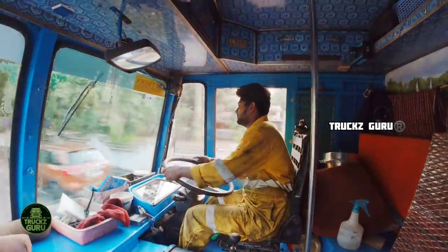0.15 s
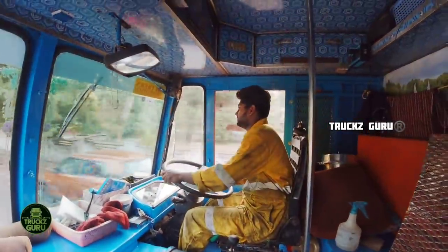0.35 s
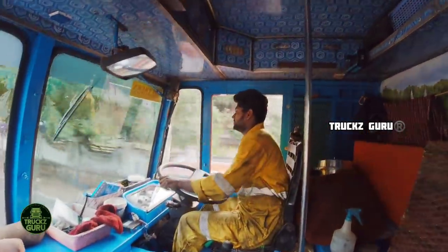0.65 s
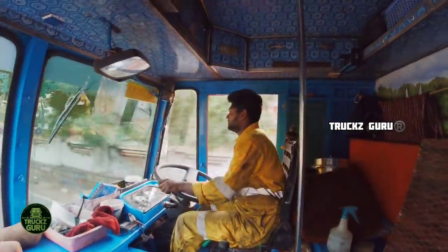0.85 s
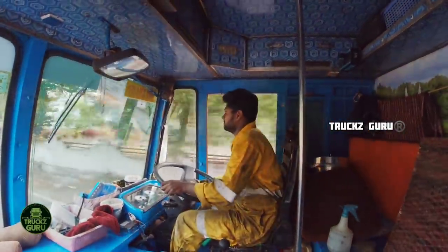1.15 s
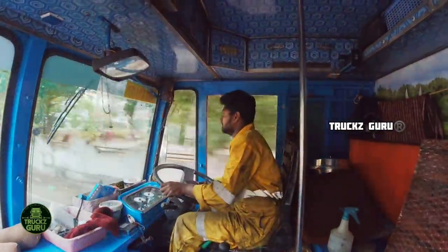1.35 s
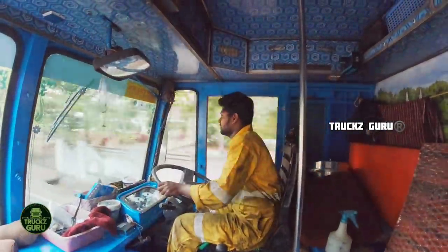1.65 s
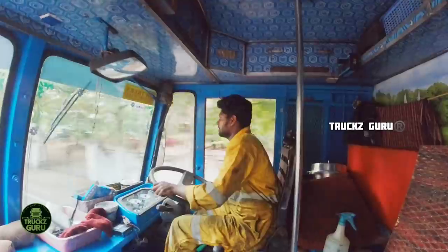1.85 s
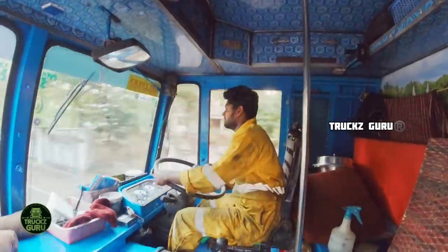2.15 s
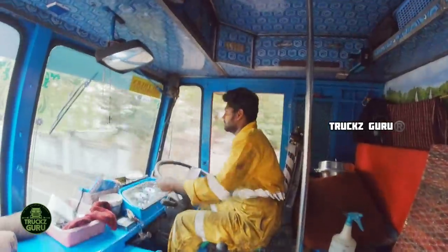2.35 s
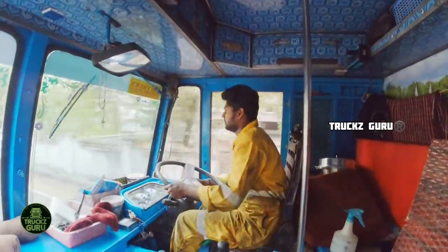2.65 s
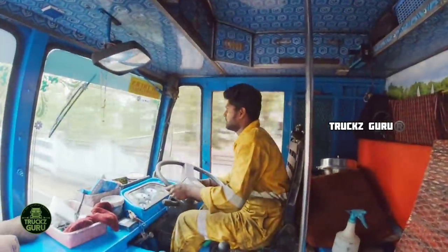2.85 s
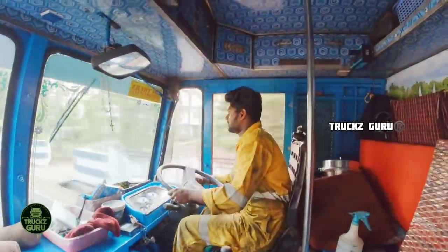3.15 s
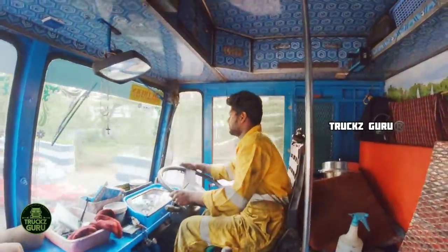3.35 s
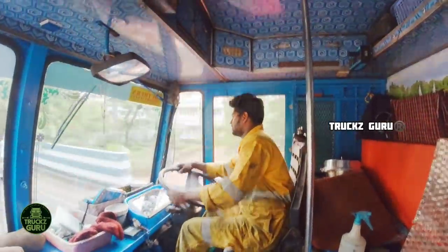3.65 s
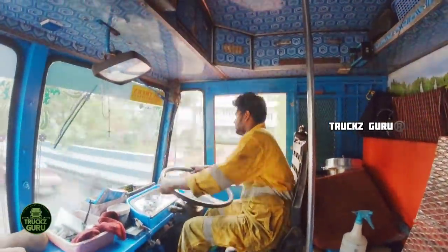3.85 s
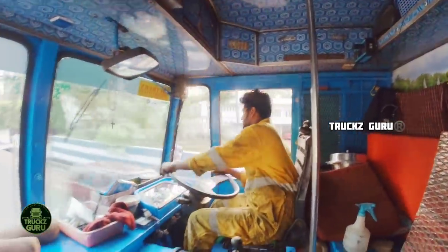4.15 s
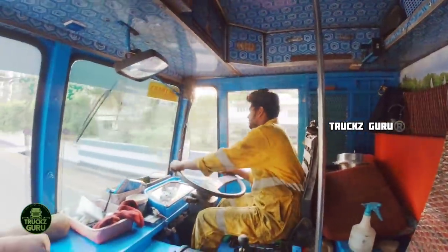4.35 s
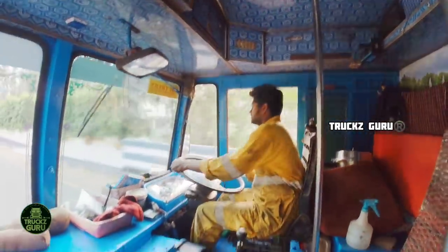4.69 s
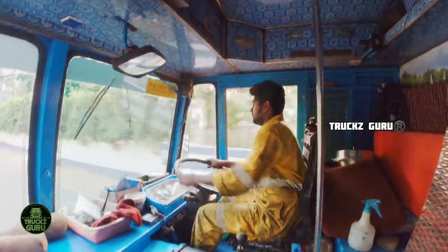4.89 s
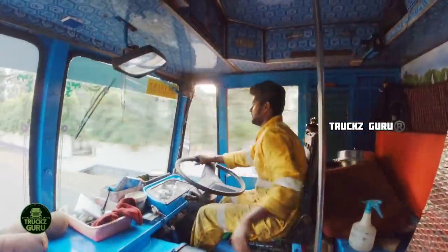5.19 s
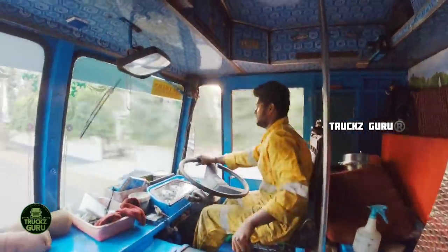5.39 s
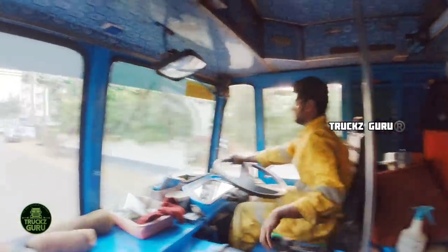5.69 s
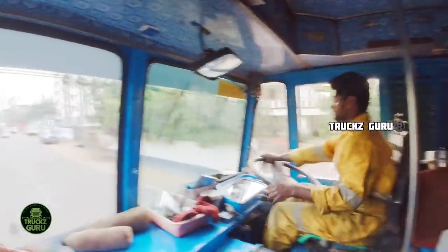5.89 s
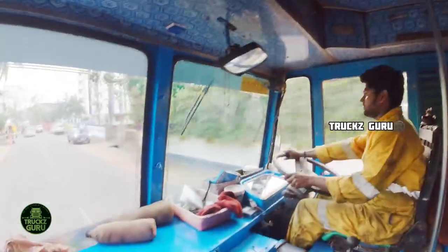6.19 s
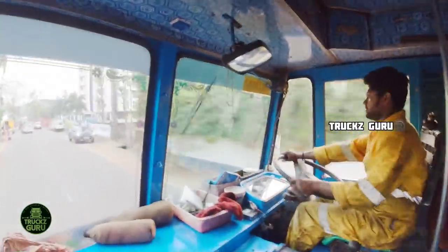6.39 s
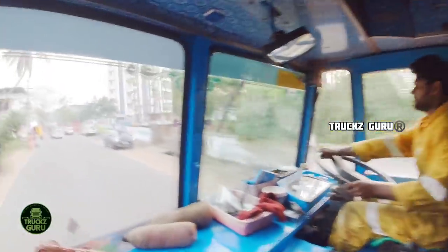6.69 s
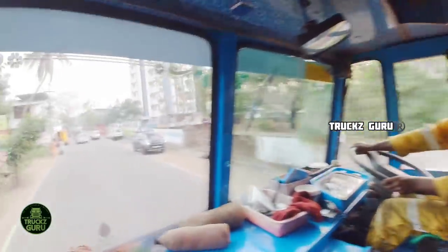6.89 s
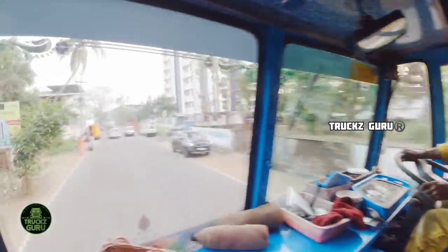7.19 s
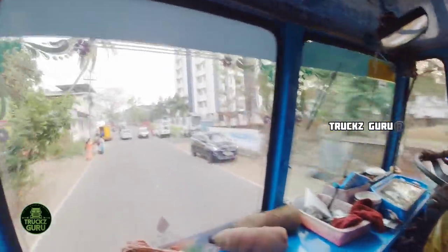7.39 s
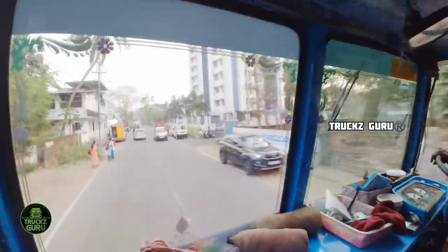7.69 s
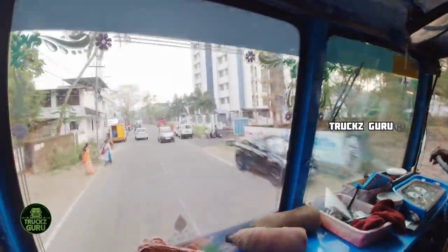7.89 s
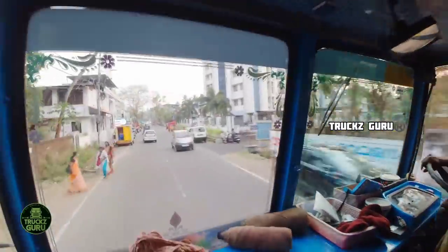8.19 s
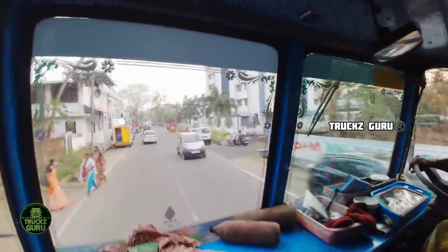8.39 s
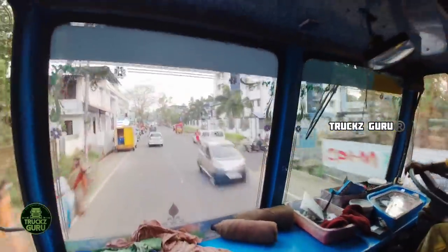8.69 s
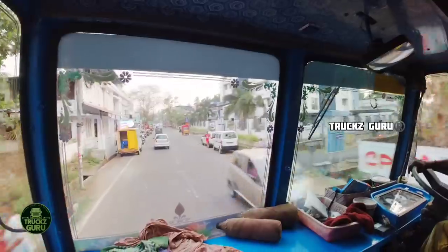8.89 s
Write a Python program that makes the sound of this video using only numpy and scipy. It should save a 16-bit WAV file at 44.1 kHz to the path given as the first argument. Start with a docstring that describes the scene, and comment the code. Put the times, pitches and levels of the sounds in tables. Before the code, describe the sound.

A heavy truck's diesel engine pulls steadily, heard from the cab on a slightly overloaded phone microphone with tyre noise and low gusts of air. Two loud air horn blasts sound close together, each with a rush of air. The engine rises gradually with a faint, very high whistle, until several bumps thud in quick succession. After that the engine eases off and the truck rolls on more quietly.

```python
"""Inside the cab of a six-cylinder diesel truck, heard by a phone with two microphone ports.
The engine pulls and its gears whine over road roar and buffeting air, with faint, very high chirps.
Just after 1 s a twin air horn gives two blasts, air beating a diaphragm in each trumpet. From 2 s the
turbo's blades whistle higher and higher, and jolts thump through the seat, most of them after 5 s.
Near 5.5 s the driver lifts off: the whistle dies and the truck coasts as the engine drops to idle."""
import sys
import numpy as np
from scipy import signal
from scipy.fft import rfft, irfft, next_fast_len
from scipy.io import wavfile
from scipy.ndimage import uniform_filter1d

SR = 44100
rng = np.random.default_rng(int(sys.argv[2]) if len(sys.argv) > 2 else 0)


def log_audio(samples):
    """Write samples as a 16-bit WAV file to the path given in sys.argv[1]."""
    # one column per channel
    frames = np.atleast_2d(samples).T
    # limit to full scale, then quantise
    limited = np.clip(frames, -1, 1)
    pcm = np.round(limited * 32767).astype(np.int16)
    wavfile.write(sys.argv[1], SR, pcm)


N = 398663
TIME_S = np.arange(N) / SR


def undb(db):
    """Turn decibels into a gain."""
    return 10 ** (np.asarray(db) / 20)


def read(table):
    """Join a table's rows into one curve per column, over time."""
    times, *columns = np.transpose(table)
    return [np.interp(TIME_S, times, column) for column in columns]


def walk(rate, size=N):
    """A smooth random wobble, about 1 in size, with `rate` new values a second."""
    count = int(size / SR * rate) + 2
    fine = signal.resample(rng.standard_normal(count), 8 * count)
    return np.interp(np.arange(size) * rate / SR, np.arange(len(fine)) / 8, fine)


def colour(table, hz):
    """Look up a spectrum's level in dB at a pitch."""
    pitches, levels = np.transpose(table)
    return np.interp(np.log(hz), np.log(pitches), levels)


# How big the ports' difference (side) is next to what they share (mid): pitch_hz, side_db
PORTS = [(60, -34), (110, -31), (200, -21), (380, -21), (700, -15.5), (1290, -11.5), (2380, 1), (4400, 1.5),
         (8120, -8.5), (15000, -12)]
def noise(lo_hz, hi_hz, table, flicker_db, rate, parts, side_db=0, length=N):
    """Stereo noise made of bands that each flicker on their own."""
    size = next_fast_len(length)
    hz = np.maximum(np.arange(size // 2 + 1) * SR / size, 1)
    mid, side = rfft(rng.standard_normal((2, size))) * undb(colour(table, hz))
    lead = 0.72 / (1 + (hz / 2500) ** 2)  # share that reaches one port first
    side = 1j * lead * mid + np.sqrt(1 - lead ** 2) * side
    pair = np.array([mid, side * undb(colour(PORTS, hz) + side_db)])
    step = np.log(hi_hz / lo_hz) / parts
    out = 0
    for k in range(parts):
        place = np.clip((np.log(hz / lo_hz) / step - k - .5), -1, 1)
        band = irfft(pair * np.cos(place * np.pi / 2) ** 2, size)[:, :length]
        out = out + undb(flicker_db * walk(rate, length)) * band
    return np.array([out[0] + out[1], out[0] - out[1]]) / np.std(out[0])


# Tone of the noise in the cab: pitch_hz, level_db
CAB_TONE = [(11, -30), (18, -12.5), (33, 2), (54, -15.5), (81, -2.5), (111, -6.5), (245, -10.5), (290, -13),
            (374, -11.5), (679, -13), (1040, -17.5), (3520, -30.5), (4540, -28.5), (7350, -43),
            (15800, -49)]
# Low noise between buffets: time_s, air_db, roar_db
RUMBLE = [(0, -37, -35), (1.1, -36, -32), (1.8, -35, -37), (2.4, -30, -27), (2.7, -32, -31),
          (3.1, -25, -28), (3.7, -26, -29), (4.7, -49, -28.5), (5.3, -36, -24), (5.5, -33, -21.5),
          (5.6, -36, -27.5), (6.5, -32, -32.5), (7.5, -29.5, -30.5), (9.04, -34, -37)]
# Buffets of air at the window: peak_s, peak_db, width_s
BUFFETS = [(1.182, -21.5, 0.057), (1.412, -23, 0.047), (1.577, -19, 0.12), (1.83, -25, 0.091),
           (2.01, -18, .07), (2.253, -21, 0.14), (2.427, -19.5, 0.086), (2.64, -20, 0.087),
           (2.82, -19, 0.074), (3.135, -14, 0.082), (3.28, -13.5, 0.056), (3.58, -20.5, .08),
           (3.86, -29, 0.073), (4.25, -27, .12), (5.023, -20.5, .06), (5.243, -20, 0.07),
           (5.437, -20, 0.09), (5.74, -37, .08), (5.96, -33, .1)]
def rumble():
    """Air buffets the window in smooth swells while the truck's body roars."""
    air_db, roar_db = read(RUMBLE)
    swells = [undb(db) * np.exp(-2 * ((TIME_S - peak) / width) ** 2) for peak, db, width in BUFFETS]
    air_gain = np.sqrt(undb(air_db) ** 2 + sum(swell ** 2 for swell in swells))
    air = air_gain * undb(-2.5) * noise(15, 76, CAB_TONE, 1, 8.6, 2)
    return air + undb(roar_db - 5) * noise(58, 434, CAB_TONE, 0.69, 8.7, 5)


# Loudness of road and engine clatter: time_s, middle_db, treble_db
CLATTER = [(0, -40, -52), (1.1, -40, -49), (2.35, -37, -50), (3.4, -38.5, -49.5), (4.45, -37.5, -48),
           (5.44, -36.5, -48.5), (5.62, -41.5, -52), (5.8, -39, -51.5), (6.32, -40.5, -52),
           (7.1, -43, -55.5), (7.9, -47.5, -58.5), (9.04, -46.5, -58.5)]
# Tone of the microphone's hiss: pitch_hz, level_db
HISS_TONE = [(7000, 0.98), (10000, -2), (13000, 0.18), (16000, .5)]
def road():
    """Tyre and engine noise, topped by the microphone's faint hiss."""
    middle_db, treble_db = read(CLATTER)
    middle = undb(middle_db + 1.47) * noise(330, 3010, CAB_TONE, 0.37, 10, 5)
    treble = undb(treble_db - .3) * noise(2500, 7500, CAB_TONE, 1.2, 10, 3)
    hiss_db = -62.5 + 0.22 * (treble_db + 53.5)
    return middle + treble + undb(hiss_db) * noise(6000, 21600, HISS_TONE, 0.28, 17, 2)


# Tones of six uneven cylinders (multiple 6 is the firing rate): multiple, pulling_db, coasting_db
ENGINE_TONES = [(1, -4, 6), (2, 3, -2), (3, 0, 1), (4, 0, -5.5), (5, -3.5, -7.5), (6, 2.5, 2.5),
                (7, -4, -3.5), (8, -11, 6.5), (9, 0, -19), (10, -13, -6), (11, -9.5, -4.5), (12, -6, 2.5),
                (13, -11.5, -8), (14, -13, -10), (16, -15.5, -8.5), (18, -10, -7.5), (20, -11.5, -9.5),
                (24, -36, -24)]
# Pitches where the cab resonates: pitch_hz, width_hz, boost_db
CAB_RESONANCES = [(35, 7.1, 2), (81.7, 4.5, 9.5), (94.6, 3.5, 10), (111.9, 5.8, 11), (129.4, 45, -5.5),
                  (185.4, 7.2, 6), (214.3, 5, 5), (240.8, 6.7, 6), (286, 5.8, 6.5), (412, 28, 4.5),
                  (418, 13, 3)]
def engine_hum(cycle_hz, phase, load_db, coasting):
    """Tones at multiples of the engine's cycle swell as they cross the cab's resonances."""
    grid_hz = np.arange(1., 600.)
    boost_db = sum(db / (1 + (2 * (grid_hz - hz) / width) ** 2) for hz, width, db in CAB_RESONANCES)
    out = 0
    for k, pull_db, coast_db in ENGINE_TONES:
        db = load_db + pull_db + coasting * (coast_db - pull_db)
        db += np.interp(k * cycle_hz, grid_hz, boost_db)
        out += undb(db + 3.17 * walk(4.5)) * np.sin(k * phase + 2 * np.pi * rng.random())
    return out


# Pitches where the engine's casing rings: pitch_hz, width_hz, level_db
CASING_RINGS = [(1079, 13, 5.5), (1411, 13, 10.5), (1783, 36, 2.5), (2155, 11, 8), (2432, 25, 4.5),
                (2800, 16, 4.5), (4250, 48, -19), (5330, 160, -12)]
def casing_clatter(phase, coasting):
    """Every firing knocks the casing with a burst of noise and makes it ring."""
    since_firing = 6 * phase / (2 * np.pi) % 1
    knocks = rng.standard_normal((2, N)) * (.3 + np.exp(-since_firing / .25))
    rings = sum(undb(db + 3.4 * walk(6)) * signal.lfilter(*signal.iirpeak(hz, hz / width, SR), knocks)
                for hz, width, db in CASING_RINGS)
    rings[1] = 0.69 * rings[0] + 0.74 * rings[1]  # the ports hear partly the same ring
    return undb(read(CLATTER)[0] - 8.5 - 5.4 * coasting) * rings / np.std(rings)


# Engine speed, in four-stroke cycles: time_s, cycle_hz
ENGINE_SPEED = [(0.0, 16.14), (2.5, 18.62), (5.0, 21.26), (5.45, 21.55), (5.9, 20.9), (6.4, 20.55),
                (6.75, 19.52), (7.75, 15.65), (8.1, 14.75), (9.04, 14.7)]
# Loudness of the engine and its gears: time_s, load_db, timing_gear_db, gearbox_db
ENGINE_LOAD = [(0, -43.5, -43, -52), (.45, -46, -43, -42), (.8, -44.5, -80, -46.5), (2, -42, -53, -36),
               (2.6, -37.5, -59, -51), (3.7, -38, -48.5, -46.5), (4.5, -39.5, -44, -40.5),
               (5.1, -45.5, -53, -44.5), (5.42, -38.5, -62, -60), (5.7, -43, -57, -46.5),
               (6.6, -46, -53, -49), (7.7, -50.5, -64, -50.5), (9.04, -49, -59, -49)]
GEAR_MULTIPLES, LIFT_OFF_S = (40, 25.85), 5.55
def engine():
    """The turning crank drives the gear whine, the hum and the clatter together."""
    cycle_hz = read(ENGINE_SPEED)[0]
    load_db, *gear_dbs = read(ENGINE_LOAD)
    coasting = np.clip((TIME_S - LIFT_OFF_S) / 0.34, 0, 1)
    phase = 2 * np.pi * np.cumsum(cycle_hz * (1 + 0.0009 * walk(6))) / SR
    whine = sum(undb(db + 3.8 * walk(9)) * np.sin(k * phase + 0.9 * walk(13))
                for k, db in zip(GEAR_MULTIPLES, gear_dbs))
    mid = whine + engine_hum(cycle_hz, phase, load_db, coasting)
    slope = np.gradient(mid)
    side = undb(-32) * slope * np.std(mid) / np.std(slope)  # one port hears it first
    return np.sqrt(2) * np.array([mid + side, mid - side]) + casing_clatter(phase, coasting)


# Faint, very high chirps: start_s, length_s, pitch_hz, level_db
HIGH_CHIRPS = [(0.384, 0.23, 11400, -60), (.75, .2, 10100, -64), (0.99, .12, 10200, -61),
               (0.994, 0.077, 8550, -59)]
def high_chirps():
    """Faint, brief, very high wavering tones that swell and fade."""
    out = np.zeros(N)
    for start, length, hz, db in HIGH_CHIRPS:
        swell = np.sin(np.pi * np.clip((TIME_S - start) / length, 0, 1))
        gain = undb(db + 3.2 * walk(61.6)) * swell
        out += gain * np.sin(2 * np.pi * np.cumsum(hz + 400 * walk(600)) / SR)
    return out


def horn_tone(phase, hz, wobble_db, rate):
    """One tone whose level wanders as reflections shift; the ports differ more in the treble."""
    size = len(phase)
    mid = undb(wobble_db * walk(rate, size)) * np.sin(phase)
    side_phase = phase + np.pi / 2 + min(hz / 2500, 1.2) * walk(rate, size)  # the nearer port leads
    side = undb(colour(PORTS, hz) + 2.5 + 3.4 * walk(rate, size)) * np.sin(side_phase)
    return np.sqrt(2) * np.array([mid + side, mid - side])


def trumpet(hz, sharp, unsettled, loud_dbs, middle, upper, blast, build_db, stop_db, flutter_hz):
    """A beating diaphragm makes multiples of one unsteady pitch; the upper ones need full pressure."""
    size = len(sharp)
    pitch_hz = hz * (1 + sharp) + (flutter_hz + 11 * unsettled) * walk(90, size)
    phase = 2 * np.pi * np.cumsum(pitch_hz) / SR
    # Each tone: multiple, level_db, wobble_db, wobbles_per_s
    tones = [(k, db + 3 * unsettled * walk(76, size), 1.1, 29.86) for k, db in enumerate(loud_dbs, 1)]
    for k, start_db, *dbs in middle:
        tones.append((k, dbs[blast] + unsettled * (start_db - dbs[blast]), 4, 21.8))
    for k, *dbs in upper:
        pressure_db = min(k * hz / 5100, 1.3) * build_db
        tones.append((k, dbs[blast] - 45.5 + pressure_db - 4 * unsettled, 4.2, 10.5))
    out = 0
    for k, db, wobble_db, rate in tones:
        fade_db = stop_db * (k * hz / 1000) ** 0.26  # treble dies faster
        out += undb(db + fade_db) * horn_tone(k * phase, k * hz, wobble_db, rate)
    return out * np.clip(np.arange(size) / (.02 * SR), 0, 1) ** 2


# Tone of the horn's rushing air: pitch_hz, level_db
RUSH_TONE = [(200, 1), (700, -2.5), (1500, 10.5), (2500, 7), (4000, 1.5), (7000, -8), (10000, -11),
             (15500, -12)]
def air_rush(t, build_db, stop_db):
    """Air rushes through the horn, with a lower rasp while the valve opens."""
    size = len(t)
    gain = undb(-25 + build_db + 0.62 * stop_db + 0.81 * walk(7.63, size)) * np.clip(t / .01, 0, 1)
    rush = noise(153, 18000, RUSH_TONE, 1.6, 34.8, parts=10, side_db=2, length=size)
    rasp = noise(770, 3100, RUSH_TONE, 2.8, 50, parts=8, length=size)
    opening = np.sin(np.pi * np.clip(t / 0.21, 0, 1))
    return gain * rush + undb(-24.5) * opening * rasp


# The air valve, and how long the low trumpet takes to catch: open_s, shut_s, catch_after_s
BLASTS = [(1.158, 2.14, .104), (2.43, 3.075, .12)]
# The four loudest tones, one list a blast: time_s, low_1_db, low_2_db, low_3_db, high_1_db
LOUD_TONES = [
    [(1.175, -43, -28.5, -51, -18), (1.269, -30, -12, -24, -44), (1.305, -26, -16, -28, -21),
     (1.355, -20, -8.5, -23, -20.5), (1.445, -18.5, -10.5, -20, -27), (1.499, -17.5, -13, -22, -18.5),
     (1.569, -20.5, -11, -24.5, -21), (1.961, -23.5, -9, -18.5, -20), (2.049, -20.5, -12.5, -26, -27),
     (2.081, -20, -13, -22.5, -23), (2.13, -19, -14.5, -22.5, -17.5)],
    [(2.45, -46, -26, -48, -20), (2.528, -36, -20.5, -24, -16), (2.574, -19, -12, -22.5, -20.5),
     (2.65, -18, -20, -23.5, -22.5), (2.75, -16.5, -16, -15, -17.5), (2.802, -20, -11, -29, -27),
     (2.834, -18, -11, -19.5, -23), (2.898, -19.5, -13.5, -16.5, -48), (2.974, -22, -15.5, -18.5, -26),
     (3.028, -28, -14.5, -15, -22), (3.065, -16, -16, -21.5, -19)],
]
# The high trumpet's next two tones: multiple, start_db, first_blast_db, second_blast_db
HIGH_MIDDLE_TONES = [(2, -28, -27.5, -30.5), (3, -28, -30.5, -29.5)]
# Each trumpet's upper tones, as relative levels: multiple, first_blast_db, second_blast_db
LOW_UPPER_TONES = [(4, 19, 14.5), (5, 15.5, 8), (6, 3, 9), (7, -3, 6.5), (8, 2, 4.5), (9, 2.5, -7),
                   (10, -1, -9), (11, 1, -13), (12, -6, 2), (13, 2.5, -2), (14, 0.5, -9), (15, -11.5, -24),
                   (16, -13, -8), (17, -11, -20), (19, -7, -25), (20, -23, -22), (21, -16, -23),
                   (22, -8.5, -4), (23, -11, -15), (24, -20, -12), (25, -15, -13)]
HIGH_UPPER_TONES = [(4, 15.5, 13.5), (5, 8, 14.5), (6, -8, -11), (7, -1, 9), (8, -1, -4), (9, 6.5, -3),
                    (10, -2.5, -16), (11, -9, -20), (13, -12, -19), (15, -21, -15)]
LOW_HZ, HIGH_HZ = 481.7, 590
def horn():
    """Air pressure builds and sounds two trumpets; both start sharp, then fall into tune."""
    out = np.zeros((2, N))
    for blast, (opens, shuts, catches) in enumerate(BLASTS):
        start, size = int(opens * SR), int((shuts - opens + .3) * SR)
        t = np.arange(size) / SR
        build_db = -26 * np.clip(1 - t / .12, 0, 1)
        since_shut = np.maximum(t - (shuts - opens), 0)
        stop_db = np.maximum(-380 * since_shut, -9.5 - 150 * since_shut)  # quick stop, then street echo
        loud_dbs = np.array(read(LOUD_TONES[blast]))[:, start:start + size]
        loose = np.clip((catches - t) / 0.0248, 0, 1)
        sharp = loose * (.09 - .045 * t / catches)  # slides down, then snaps into tune
        low = trumpet(LOW_HZ, sharp, loose, loud_dbs[:3], [], LOW_UPPER_TONES,
                      blast, build_db, stop_db, flutter_hz=0.7)
        settling = np.exp(-t / .03)
        high = trumpet(HIGH_HZ, .055 * settling, settling, loud_dbs[3:], HIGH_MIDDLE_TONES,
                       HIGH_UPPER_TONES, blast, build_db, stop_db, flutter_hz=1)
        fade = np.clip((t[-1] - t) / .05, 0, 1)
        out[:, start:start + size] += fade * (low + high + air_rush(t, build_db, stop_db))
    return out


# The turbo's whistle: time_s, pitch_hz, level_db
TURBO = [(2.1, 10790, -80), (2.22, 10885, -60), (2.42, 11040, -64), (3.15, 11650, -51), (4.0, 12291, -48),
         (4.16, 12394, -44), (4.85, 12746, -46), (5.42, 12929, -44), (5.52, 12256, -45), (5.6, 11926, -65)]
def turbo():
    """Spinning blades make a wavering whistle inside a narrow band of air noise."""
    breath = signal.sosfilt(signal.butter(3, 450, fs=SR, output="sos"), rng.standard_normal((2, N)))
    hz, db = read(TURBO)
    spinning = uniform_filter1d(1. * ((TIME_S > TURBO[0][0]) & (TIME_S < TURBO[-1][0])), size=400)
    phase = 2 * np.pi * np.cumsum(hz + 12 * walk(40)) / SR
    air = (breath[0] * np.sin(phase) + breath[1] * np.cos(phase)) / np.std(breath)
    gain = spinning * undb(db + 3 * walk(14))
    whistle = undb(1.5 + 3 * walk(30)) * np.sin(phase)
    return gain * (whistle + undb(-4.5) * air)


# Jolts through the seat: start_s, level_db, pitch_hz
JOLTS = [(3.239, -16, 40), (5.005, -18, 190), (5.008, -15, 30), (5.195, -18, 45), (5.235, -14, 40),
         (5.258, -18, 260), (5.272, -17, 55), (5.383, -15, 130), (5.397, -16, 50), (5.422, -17, 90),
         (5.442, -16, 60), (5.465, -15, 200), (5.495, -15, 220)]
def jolts():
    """Each jolt is a dull thump: a low tone that dies within a couple of swings."""
    out, t = np.zeros(N), np.arange(SR // 4) / SR
    for start_s, db, hz in JOLTS:
        start = int(start_s * SR)
        out[start:start + len(t)] -= undb(db) * np.sin(2 * np.pi * hz * t) * np.exp(-2 * hz * t)
    return out


def scene():
    """All the sounds added up at the two ports."""
    return engine() + rumble() + road() + turbo() + horn() + jolts() + high_chirps()


def record(dry):
    """The overdriven microphone bends the wave lopsidedly; the deepest lows and the top are cut."""
    bent = np.tanh(0.73 * dry) / 0.79 + 0.071 * dry ** 2
    bent = signal.sosfilt(signal.butter(1, 12, "high", fs=SR, output="sos"), bent)
    return signal.sosfilt(signal.ellip(12, .3, 80, 15760, fs=SR, output="sos"), bent)


dry = scene()
out = record(dry)
log_audio(out)
```